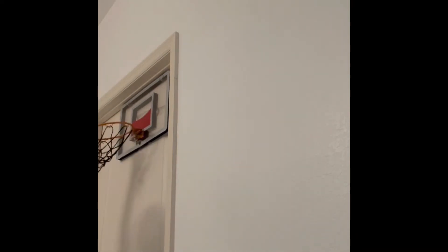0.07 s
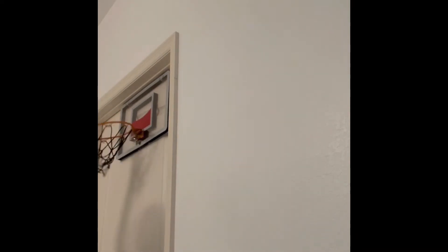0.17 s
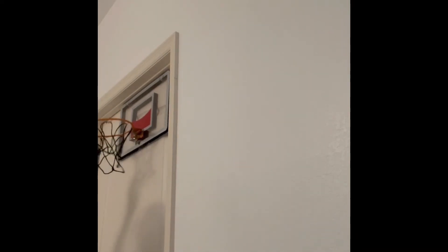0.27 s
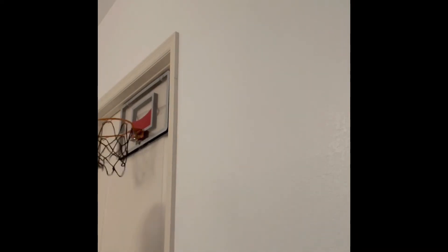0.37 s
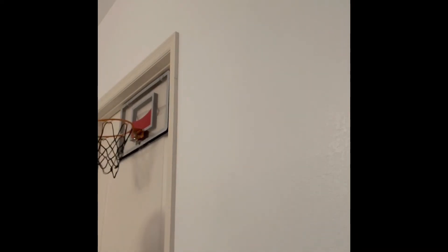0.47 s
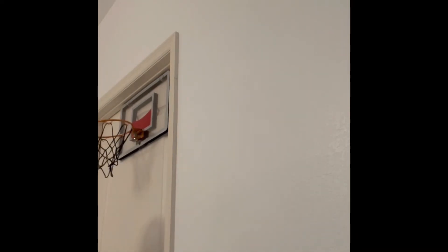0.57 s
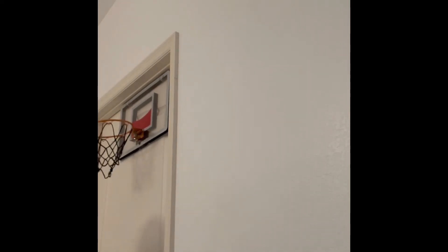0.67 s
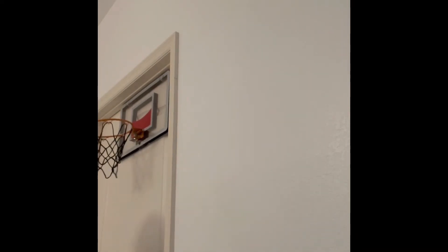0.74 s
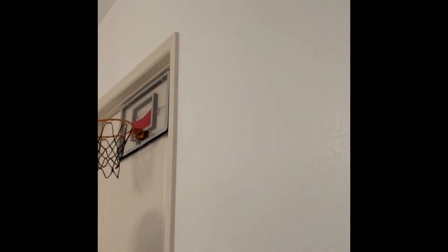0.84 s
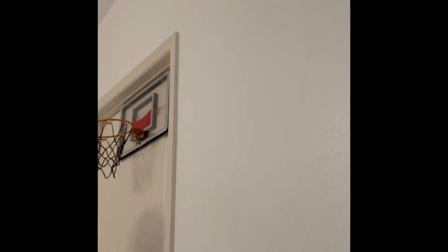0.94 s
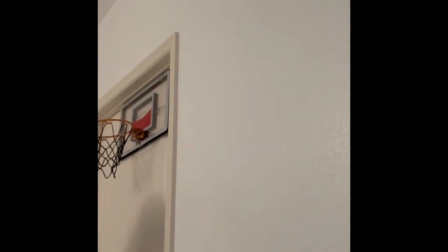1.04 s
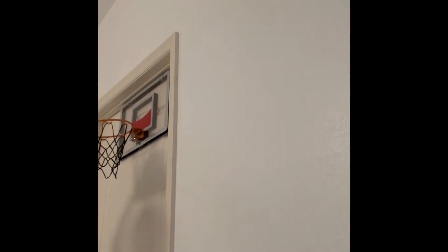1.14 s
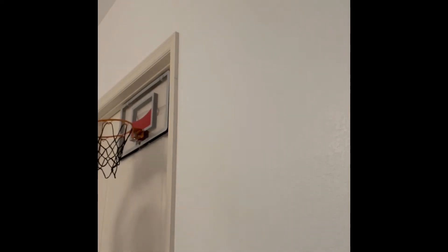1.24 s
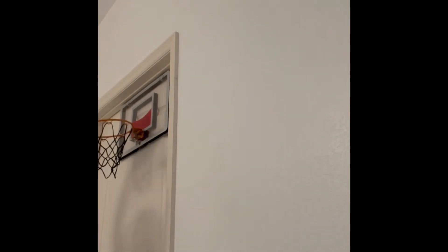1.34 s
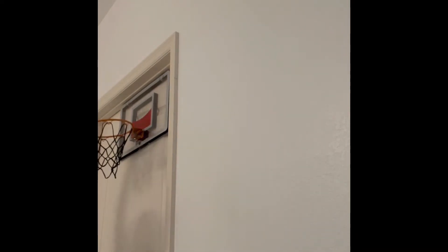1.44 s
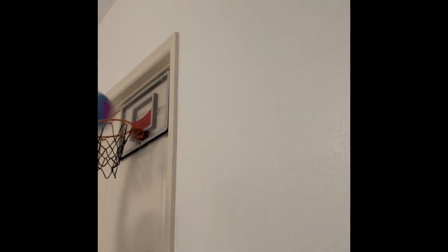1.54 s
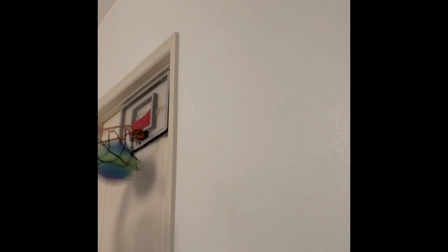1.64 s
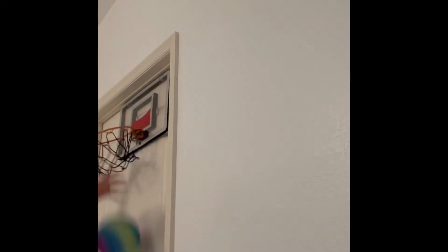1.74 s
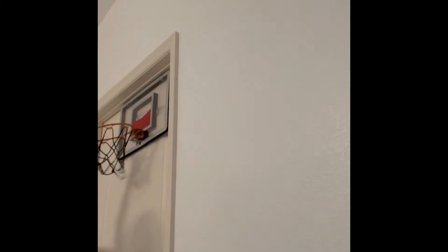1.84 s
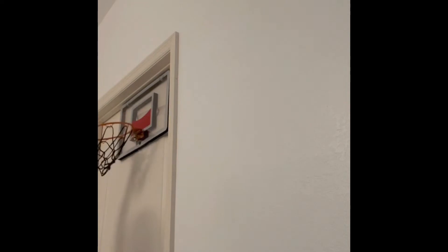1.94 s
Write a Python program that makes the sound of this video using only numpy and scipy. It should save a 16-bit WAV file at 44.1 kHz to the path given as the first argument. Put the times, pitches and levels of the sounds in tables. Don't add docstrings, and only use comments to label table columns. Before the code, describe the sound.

A small door-hung basketball hoop slaps hard against a hollow door, then is dunked again indoors

```python
import sys
import numpy as np
from scipy import signal
from scipy.fft import rfft, irfft, next_fast_len
from scipy.io import wavfile
from scipy.ndimage import uniform_filter1d

SR = 44100
rng = np.random.default_rng(int(sys.argv[2]) if len(sys.argv) > 2 else 0)


def amplitude_ratio(level_db):
    exponent = np.asarray(level_db, float) / 20
    return 10 ** exponent


def inscribe(sig):
    pcm = np.round(np.clip(np.atleast_2d(sig).T, -1, 1) * 32767)
    wavfile.write(sys.argv[1], SR, pcm.astype(np.int16))


N = 88200
LEAD = int(0.3 * SR)
T = np.arange(-LEAD, N) / SR

# (frequency [Hz], level [dB per Hz])
DUNK_COLOUR = [(180, -28), (300, -17.5), (941, -7), (1190, -10), (2120, -16), (2950, -14), (3920, -20),
               (5640, -22.5), (15800, -41.5)]
# (frequency [Hz], level [dB], t60 [s])
DOOR_REBOUND = [(113.4, -12, 0.19), (174, -15, 0.11), (258, 1, 0.04), (295, 0, 0.064), (369.3, -1.5, 0.11),
                (430, 0, 0.051), (472, -2.5, 0.074), (585.5, -9.5, 0.1), (734, -15, 0.07),
                (1043, -28, 0.03)]
DOOR_DUNK = [(122, -7, 0.083), (195, 1, 0.034), (241, -6.5, 0.068), (354, 4, 0.033), (427, 3.5, 0.037),
             (531, 1, 0.041), (689, -1.5, 0.045), (763, 0, 0.027), (826, -13, 0.055), (928, -0.5, 0.025),
             (1085, -15.5, 0.018)]
# (frequency [Hz], level [dB], t60 [s])
BOARD = [(1470, -8.5, 0.025), (1870, -3, 0.0067), (2928, -0.5, 0.025), (4040, -9.5, 0.014),
         (5300, 1.5, 0.019), (6760, -1, .01)]
# (frequency [Hz], level [dB], t60 [s])
RIM = [(1340, -1, .36), (1388, -1, .36), (1464, -1, .25), (1700, -16, .3), (2164, -7, .4), (2875, -14, .3),
       (3112, -6, .2), (3500, -18, .3), (3731, -12, .3), (4360, -16, .25)]
BOARD_DETUNE, RIM_DETUNE = 0.04, 0.001


def unit(x):
    return x / np.sqrt(np.mean(x ** 2))


def curve(table, hz):
    table = np.array(table, float)
    return np.interp(np.log(hz), np.log(table[:, 0]), table[:, 1])


def noise(colour, low_hz=20.):
    hz = np.arange(len(T) // 2 + 1) * SR / len(T) + 1
    gain = amplitude_ratio(curve(colour, hz)) / (1 + (low_hz / hz) ** 4)
    return unit(irfft(rfft(rng.standard_normal(len(T))) * gain, len(T)))


def narrow(hz, width_hz):
    b, a = signal.iirpeak(hz, hz / width_hz, fs=SR)
    return unit(signal.lfilter(b, a, rng.standard_normal(len(T))))


def flicker(rate_hz):
    hold = int(SR / rate_hz)
    steps = np.repeat(rng.standard_normal(len(T) // hold + 1), hold)
    return unit(uniform_filter1d(steps, hold)[:len(T)])


def decay(t, t60_s):
    return np.exp(-np.log(1000) * t / t60_s)


def ring(modes, since, rise_s, detune):
    scatter_db = 1.5
    hz, db, t60_s = np.array(modes, float).T[:, :, None]
    level_chance, pitch_chance, phase_chance = rng.standard_normal((3,) + hz.shape)
    phase = 2 * np.pi * (hz * (1 + detune * pitch_chance) * since + phase_chance)
    level = amplitude_ratio(db + scatter_db * level_chance)
    return (1 - np.exp(-since / rise_s)) * np.sum(level * np.sin(phase) * decay(since, t60_s), axis=0)


def knocks(contacts, colour, door, hard, hard_detune):
    tail_s, tail_db, door_detune = 0.024, -15, 0.015
    out = np.zeros((2, len(T)))
    hiss = noise(colour, low_hz=300.)
    since = np.arange(SR // 2 + SR // 4) / SR
    for s, crack_db, door_db, ring_db, length_ms in contacts:
        i = int(s * SR) + LEAD
        t = since[:len(T) - i]
        span = slice(i, i + len(t))
        length_s = length_ms / 1000
        fall = np.exp(-t / length_s) + amplitude_ratio(tail_db) * np.exp(-t / tail_s)
        crack = fall * np.minimum(10 * t / length_s, 1)
        out[0, span] += amplitude_ratio(crack_db) * crack * hiss[span]
        out[0, span] += amplitude_ratio(door_db) * ring(door, t, length_s, door_detune)
        out[1, span] += amplitude_ratio(ring_db) * ring(hard, t, length_s / 10, hard_detune)
    return out


def slap():
    # (time [s], crack [dB], door rattle [dB], ring [dB], contact length [ms])
    slap_hits = [
        (.1998, -9, -23, -31, 1.2),
        (.2033, -6, -20.5, -38, 1.4),
        (.2066, -4, -10.5, -24.5, 0.42),
        (.2118, -12, -5, -41.5, 1.3),
        (.2165, -29, -7.5, -43.5, 1.6),
        (.228, -15.5, -9.5, -41, 1.9),
        (.2385, -14, -9.5, -39.5, 2),
        (.266, -13, -18.5, -35, 2),
    ]
    # (frequency [Hz], level [dB per Hz])
    slap_colour = [(300, 9), (1200, 1), (2000, -2), (3200, -0.5), (5400, -2.5), (8000, -11.5), (11000, -14),
                   (16000, -12.5)]
    # (frequency [Hz], level [dB], t60 [s])
    slap_door = [(105.5, -11, 0.099), (194, -13, 0.088), (265.6, -19, 0.075), (328, -8.5, .05),
                 (374.7, -9.5, 0.14), (419.6, -2, 0.057), (458, -7, 0.05), (500, -6, 0.089),
                 (616, -10.5, 0.11), (773, -16.5, 0.034), (988, -15.5, 0.04)]
    return knocks(slap_hits, slap_colour, slap_door, RIM, RIM_DETUNE)


def dunk():
    # (time [s], crack [dB], door rattle [dB], ring [dB], contact length [ms])
    dunk_hits = [(1.5808, -24.5, -15.5, -34, 9.8), (1.5955, -18.5, -13, -11.5, 14),
                 (1.604, -36, -16, -23, 6.9), (1.6115, -19.5, -10.5, -23, 4.2),
                 (1.619, -31, -13.5, -24, 1.7), (1.627, -21, -13, -41, 1.5), (1.635, -28, -15, -38, 3),
                 (1.643, -27.5, -18.5, -34, 3.5), (1.652, -24.5, -17, -49, 4.5),
                 (1.665, -28, -18.5, -44, 4), (1.684, -32, -15, -44, 2.3), (1.708, -50, -21.5, -42, 6.5),
                 (1.772, -54, -21.5, -56, 3.5)]
    return knocks(dunk_hits, DUNK_COLOUR, DOOR_DUNK, BOARD, BOARD_DETUNE)


def rebound():
    # (time [s], crack [dB], door rattle [dB], ring [dB], contact length [ms])
    rebound_hits = [
        (.4815, -32, -25, -57.5, 5.4),
        (.4925, -33, -27, -47, 4.9),
        (.4985, -24.5, -28, -54, 9.4),
        (.506, -32, -28.5, -51, 1.6),
        (.514, -43, -26, -43, 2.5),
        (.528, -45, -26.5, -65, 1.5),
        (.543, -50, -27, -48, 1.1),
    ]
    # (frequency [Hz], level [dB per Hz])
    rebound_colour = [(180, -23), (300, 6.5), (527, 0.5), (825, -11.5), (1380, -5), (1770, -20),
                      (2190, -12.5), (10400, -30), (15800, -28)]
    return knocks(rebound_hits, rebound_colour, DOOR_REBOUND, RIM, RIM_DETUNE)


def earlier_dunk():
    # (time [s], crack [dB], door rattle [dB], ring [dB], contact length [ms])
    earlier_hits = [
        (-.13, -16, -24, -52, 3.2),
        (-.04, -29.5, -15, -51.5, 3.8),
    ]
    return knocks(earlier_hits, DUNK_COLOUR, DOOR_DUNK, BOARD, BOARD_DETUNE)


def steps():
    # (time [s], crack [dB], door rattle [dB], ring [dB], contact length [ms])
    step_hits = [
        (.878, -72.5, -54, -53, 15),
        (1.12, -60, -43.5, -66, 12.3),
        (1.195, -55, -45, -67.5, 16),
        (1.238, -60, -69, -55, 1.9),
    ]
    return knocks(step_hits, DUNK_COLOUR, DOOR_REBOUND, BOARD, BOARD_DETUNE)


def door_swing():
    rise_s = 0.0013
    # (time [s], level [dB], frequency [Hz], t60 [s])
    booms = [
        (-.05, -28.5, 107.2, 0.56),
        (-.03, -27.5, 185.1, .5),
        (0.204, -10.5, 86.5, 0.14),
        (0.207, -20, 58.6, 0.6),
        (0.501, -14.5, 77, 0.069),
        (1.2, -45, 70, 0.21),
        (1.61, -8.5, 61.5, 0.094),
        (1.695, -14, 71, 0.071),
        (1.775, -21.5, 68.5, 0.124),
    ]
    # (time [s], level [dB], frequency [Hz], t60 [s])
    bumps = [(0.2004, -3, 3160, .016), (.2015, -9.5, 430, 0.048), (.2062, -10, 3230, .014),
             (0.211, -6, 3130, 0.013), (.2118, -17, 5000, .012), (.2285, -2, 5410, .014),
             (.212, -13, 192.3, 0.089), (1.603, -14, 193, 0.06), (1.62, -16, 189, 0.13),
             (0.49, -19.5, 455, 0.087), (.515, -14.5, 264.6, 0.094), (.528, -22.5, 410, 0.12),
             (1.128, -42.5, 295, 0.08), (1.195, -45, 500, .09), (1.236, -48, 4000, .035),
             (1.236, -55, 2900, .05), (1.5819, -12.5, 390, 0.055), (1.586, -15, 560, 0.074)]
    out = 0
    for s, db, hz, t60_s in [*booms, *bumps]:
        t = np.maximum(T - s, 0)
        swell = 1 - np.exp(-t / rise_s)
        out = out + amplitude_ratio(db) * swell * decay(t, t60_s) * np.sin(2 * np.pi * hz * t)
    return out


def rim_song():
    # (frequency [Hz], level [dB], t60 [s])
    song_modes = [(180, -39, .9), (1335, -38, .6), (1384, -43, .5), (1450, -50, .35), (2164, -42, .45),
                  (3728, -51, 1.3)]
    # (time [s], level [dB])
    jolts = [
        (.2, 4),
        (.495, 0),
    ]
    return sum(amplitude_ratio(db) * ring(song_modes, np.maximum(T - s, 0), 0.0067, RIM_DETUNE) for s, db in jolts)


def swishes_and_clicks():
    # (start [s], rise [s], fall [s], body [dB], airy top [dB])
    swishes = [(0.173, 0.026, 0.021, -45.5, -75), (0.2001, .0003, 0.0012, -12, -7),
               (.2035, .0004, 0.0019, -13, -21.5), (0.2056, 0.0004, .0014, -3.5, -9.5),
               (0.2113, .0004, .0014, -16.5, -24), (0.23, .001, 0.0059, -20.5, -32),
               (0.476, .006, 0.023, -54, -48.5), (0.4887, 0.0039, 0.012, -37.5, -42),
               (.56, 0.19, 0.1, -57.5, -69), (.88, 0.13, 0.35, -62.5, -65.5),
               (1.13, 0.065, 0.0303, -65, -70), (1.502, .05, 0.024, -64.5, -66.5),
               (1.5808, .002, 0.022, -54, -38), (1.802, 0.0086, 0.027, -38, -43)]
    # (frequency [Hz], level [dB per Hz])
    swish_colour = [(1500, -6.5), (2900, -1.5), (6000, -6), (9000, -7.5), (11000, -17), (16000, -40.5)]
    air_colour = [(8000, -35.5), (11000, -6.5), (14000, 4.5), (16000, -7.5)]
    grain_db = -3.5
    body, air = noise(swish_colour, low_hz=1200.), noise(air_colour)
    out = 0
    for s, rise_s, fall_s, body_db, air_db in swishes:
        shape = np.clip((T - s) / rise_s, 0, 1) * np.exp(-np.maximum(T - s - rise_s, 0) / fall_s)
        out = out + shape * (amplitude_ratio(body_db) * body + amplitude_ratio(air_db) * air)
    return out * amplitude_ratio(grain_db * flicker(900))


def bracket():
    start_s, length_s, squeak_db = 0.085, 0.12, -49
    hz, width_hz, throb_hz = 2880, 220, 66
    bow = np.sin(np.pi * np.clip((T - start_s) / length_s, 0, 1))
    throb = (0.5 + 0.5 * np.cos(2 * np.pi * throb_hz * (T - 0.1345))) ** 1.4
    return amplitude_ratio(squeak_db) * bow * throb * narrow(hz, width_hz)


def room(x):
    # (frequency [Hz], t60 [s])
    room_t60 = [(50, 0.94), (200, 0.54), (500, 0.73), (1200, 0.8), (3000, 0.54), (7000, 0.61), (11000, 0.4),
                (16000, 0.33)]
    level_db, gap_s, build_s = -4.5, 0.007, 0.0058
    t = np.arange(SR + SR // 2) / SR
    white = rfft(rng.standard_normal(len(t)))
    octave = np.log2(np.arange(len(white)) * SR / len(t) + 1)
    tail = 0
    for centre in np.arange(5, 14.5, 0.5):
        band = irfft(white * np.clip(1 - 2 * np.abs(octave - centre), 0, 1), len(t))
        tail = tail + band * decay(t, curve(room_t60, 2 ** centre))
    tail = tail * (1 - np.exp(-np.maximum(t - gap_s, 0) / build_s))
    return amplitude_ratio(level_db) * signal.fftconvolve(x, tail / np.sqrt(np.sum(tail ** 2)))[:len(x)]


def house():
    # (frequency [Hz], level [dB per Hz])
    hum_colour = [(25, -6.5), (64, -3.5), (150, -38.5), (400, -16), (1200, -22), (3000, -30), (10000, -44),
                  (16000, -35.5)]
    # (frequency [Hz], width [Hz], level [dB])
    hum_bands = [(70, 19, -56), (197, 15, -69.5), (250, 12, -63.5), (452, 15, -81), (840, 16, -68.5),
                 (1154, 17, -71), (1480, 21, -79)]
    air = amplitude_ratio(-55.5 + 1.7 * flicker(4.1)) * noise(hum_colour)
    lines = sum(amplitude_ratio(db + 2.8 * flicker(8.1)) * narrow(hz, width_hz) for hz, width_hz, db in hum_bands)
    whine_hz = 571 + 2.32 * flicker(11)
    whine = amplitude_ratio(-58 + 2.0 * flicker(24.6)) * np.sin(2 * np.pi * np.cumsum(whine_hz) / SR)
    return air + lines + whine


def scene():
    ring_wet_db, swing_wet_db, new_spot_s = -12, -8, 1.0
    body, rings = slap() + dunk() + rebound() + earlier_dunk() + steps()
    swing = door_swing()
    near = body + swishes_and_clicks() + bracket()
    sent = near + amplitude_ratio(ring_wet_db) * rings + amplitude_ratio(swing_wet_db) * swing
    wet = room(sent * (T < new_spot_s)) + room(sent * (T >= new_spot_s))
    return (near + rings + swing + rim_song() + wet + house())[None, LEAD:]


def low_pass(x):
    return signal.sosfilt(signal.butter(12, 15910, fs=SR, output="sos"), x)


def record(dry):
    # (frequency [Hz], level [dB])
    mic = [(20, -13.5), (50, 4), (8000, -1.5), (10500, -3), (13500, -3), (15600, -2.5), (16200, -35)]
    ceiling = 1.0
    size = 2 * next_fast_len(N)
    hz = np.arange(size // 2 + 1) * SR / size + 1
    cepstrum = irfft(np.log(amplitude_ratio(curve(mic, hz))), size)
    fold = (1 + np.sign(size // 2 - np.arange(size))) / (1 + (np.arange(size) == 0))
    causal = np.exp(rfft(cepstrum * fold))
    heard = irfft(rfft(dry, size) * causal, size)[:, :N]
    rounded = heard / (1 + np.abs(heard / ceiling) ** 8) ** (1 / 8)
    return low_pass(rounded)


dry = scene()
out = record(dry)
inscribe(out)
```